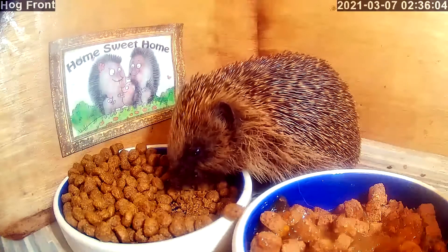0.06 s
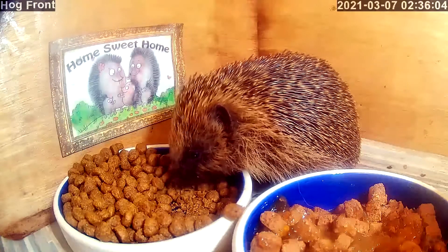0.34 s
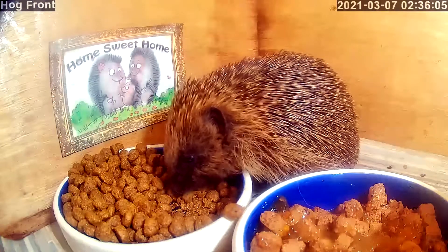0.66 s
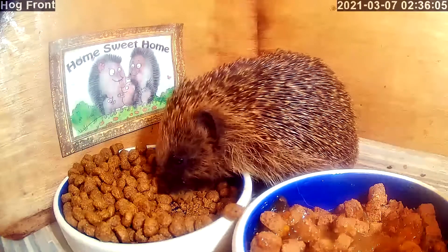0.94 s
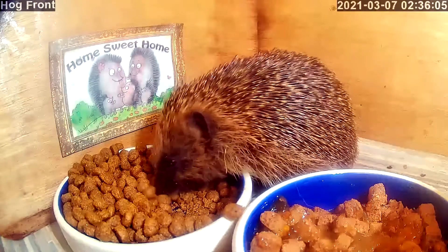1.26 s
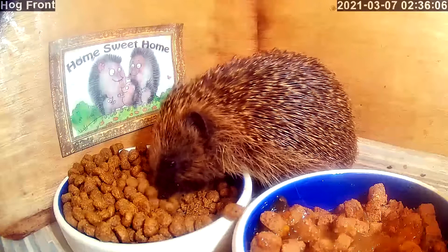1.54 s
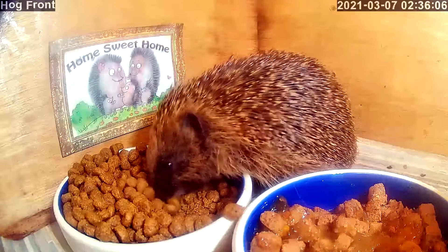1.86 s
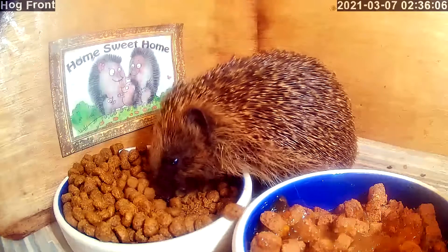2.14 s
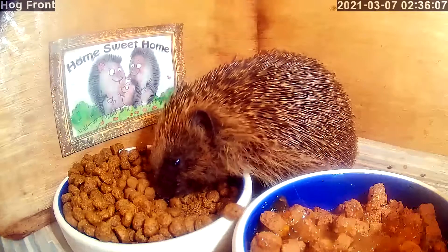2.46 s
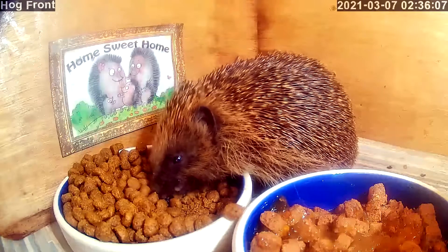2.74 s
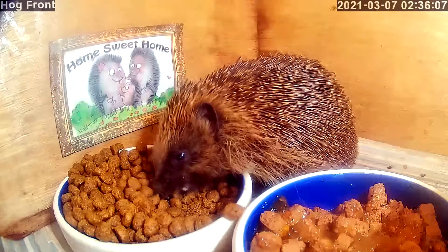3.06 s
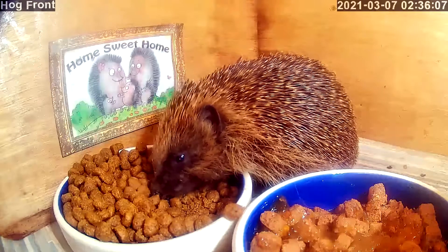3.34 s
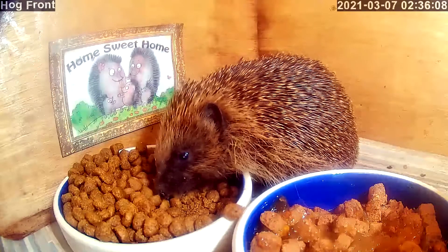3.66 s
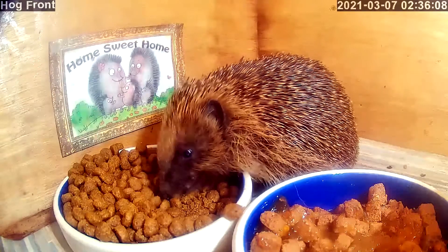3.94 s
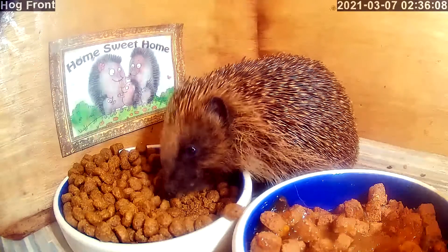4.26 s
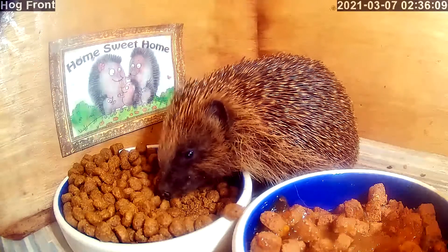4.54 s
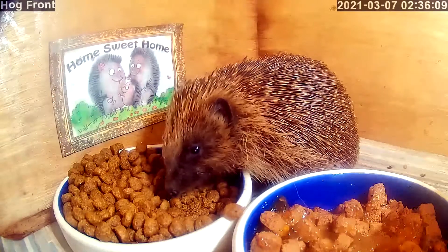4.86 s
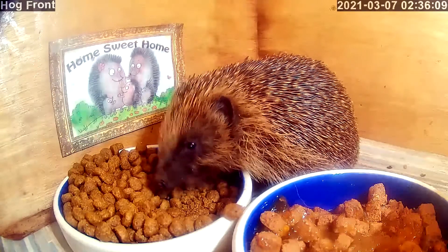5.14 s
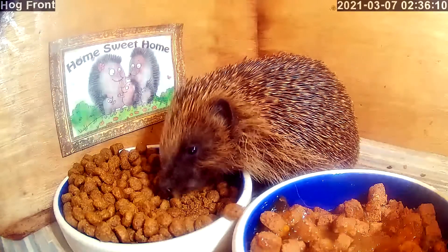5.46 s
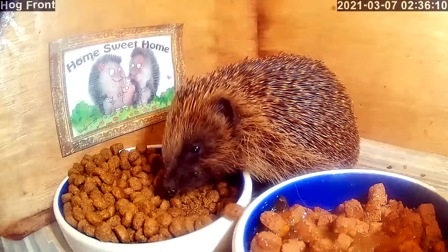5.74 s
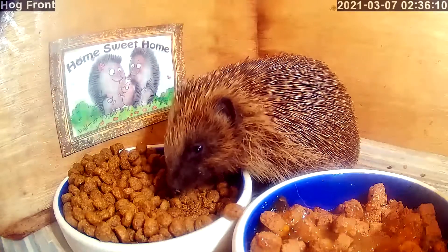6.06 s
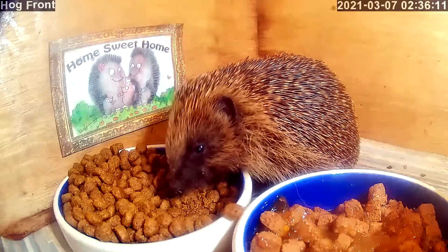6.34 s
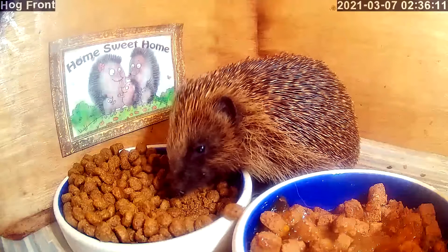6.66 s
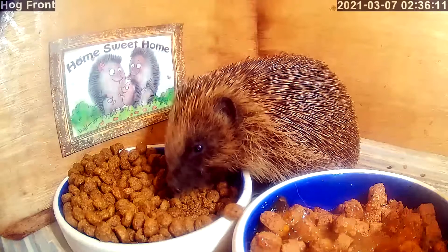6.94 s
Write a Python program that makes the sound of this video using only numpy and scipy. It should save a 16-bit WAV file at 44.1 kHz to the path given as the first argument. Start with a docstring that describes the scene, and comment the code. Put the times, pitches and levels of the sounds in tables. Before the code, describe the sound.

A hedgehog thumps softly on a wooden floor, sniffs, then crunches dry kibble in a small box over a faint hum.

```python
"""A hedgehog eats dry kibble in a small wooden feeding box, close to a night camera.
Over the camera's faint hum and hiss, paws thud on the floor board. The snout bumps the bowl, the
feet shuffle, and it puffs through its nose into the food. Then the kibble cracks, every break
ringing the box; a paw skids on the wood, and the chewing grows finer and finer."""
import sys
import numpy as np
from scipy import signal
from scipy.fft import rfft, irfft
from scipy.io import wavfile
from scipy.ndimage import uniform_filter1d

SR = 44100
rng = np.random.default_rng(int(sys.argv[2]) if len(sys.argv) > 2 else 0)


def materialize(psi):
    """Save the field psi as 16-bit PCM at rate SR to the path in sys.argv[1].

    A 1-D psi becomes a single channel; in a 2-D psi each row is a channel.
    """
    bounded = np.clip(np.atleast_2d(psi).T, -1, 1)
    quanta = np.round(bounded * 32767).astype(np.int16)
    wavfile.write(sys.argv[1], SR, quanta)


N = 317520
RING_TIME_S = np.arange(SR // 6) / SR  # time after a hit
HIT_SAMPLES = SR // 20  # a hit's level is its energy spread over 50 ms
STRAIN_SAMPLES = SR // 40  # a piece strains this long before it breaks


def undb(db):
    """Decibels to gain."""
    return 10 ** (np.asarray(db) / 20)


def at_rms(x, db):
    """A steady sound set to an rms level."""
    return x * undb(db) / np.sqrt(np.mean(x ** 2))


def hit_at(x, db):
    """A short sound set to a level by its energy."""
    return x * undb(db) / np.sqrt(np.sum(x ** 2) / HIT_SAMPLES)


def add(out, start_s, x):
    """Mix x into out from start_s on."""
    i = max(int(start_s * SR), 0)
    out[i:i + len(x)] += x[:len(out) - i]


def butter(x, hz, kind, order=4):
    """Butterworth filter."""
    return signal.sosfilt(signal.butter(order, hz, kind, fs=SR, output="sos"), x)


def excite(force, response):
    """Play a force through an impulse response, for the length of the longer one."""
    return signal.fftconvolve(force, response)[:max(len(force), len(response))]


def equalise(x, curve, size=2048):
    """Minimum-phase EQ through (freq_hz, gain_db) points."""
    hz, db = np.transpose(curve)
    bins_hz = np.arange(size + 1) * SR / (2 * size)
    log_gain = np.log(undb(np.interp(np.log(bins_hz + 1), np.log(hz), db)))
    cepstrum = irfft(log_gain)[:size] * np.r_[1, np.full(size - 1, 2)]
    return excite(x, irfft(np.exp(rfft(cepstrum, 2 * size)))[:size])


def ring(modes):
    """One damped sine a row; neighbours swing opposite ways, so their sum takes a moment to build."""
    t = RING_TIME_S
    return np.array([(-1) ** k * undb(db) / t60_s * np.sin(2 * np.pi * hz * t) * undb(-60 * t / t60_s)
                     for k, (hz, db, t60_s) in enumerate(modes)])


def drift(rate_hz):
    """Smooth random movement with a spread of 1."""
    hold = int(SR / rate_hz)
    stairs = np.repeat(rng.standard_normal(N // hold + 1), hold)[:N]
    smooth = uniform_filter1d(uniform_filter1d(stairs, hold), hold)
    return smooth / smooth.std()


def fader(curve):
    """Gain that rides through (time_s, gain_db) points and is silent outside them."""
    times_s, db = np.transpose(curve)
    ride_db = np.interp(np.arange(N) / SR, times_s, db, left=-np.inf, right=-np.inf)
    return uniform_filter1d(undb(ride_db), SR // 200)


def grains(samples, rate_hz, spread_db):
    """Tiny random clicks of uneven size."""
    fires = rng.random(samples) < rate_hz / SR
    sizes = undb(spread_db * rng.standard_normal(samples))
    return fires * sizes * rng.choice([-1, 1], samples)


# EQ of the noise bed: freq_hz, gain_db
HISS_EQ = [(25, -12.5), (50, -20.5), (66, 2.5), (100, 3.5), (200, -8), (400, -13), (1000, -17.5),
           (2200, -22), (3200, -25.5), (4000, -32.5), (5000, -44), (7000, -58)]
# the hum and its two thin whines: pitch_hz, level_db
HUM_TONES = [(101, -71.5), (1647, -108.5), (2105, -88.5)]


def camera_noise(hiss_db=-67.5, waver_hz=5, flutter_db=2):
    """The camera's bed of low rumble and hiss, with a wavering hum and whine."""
    hiss = at_rms(equalise(rng.standard_normal(N), HISS_EQ), hiss_db)
    bed = hiss * undb(1.2 * drift(rate_hz=0.67))
    for hz, db in HUM_TONES:
        phase = 2 * np.pi * np.cumsum(hz + waver_hz * drift(rate_hz=39)) / SR
        bed += at_rms(np.sin(phase) * undb(flutter_db * drift(rate_hz=4.1)), db)
    return bed


# low modes of the floor board: pitch_hz, weight_db, t60_s
BOARD_MODES = [(86.7, 3.5, 0.15), (110.5, -0.5, 0.069), (135, -5.5, .06), (225, -8, 0.075),
               (308.2, -13, 0.066)]
# footfalls: start_s, thud_db, knock_re_thud_db
FOOTFALLS = [(0.063, -43.5, -1.5), (0.212, -45.5, -2), (0.321, -47.5, -30), (0.464, -46, -46),
             (0.561, -59.5, -8.5), (0.787, -58.5, -0.5), (0.818, -52, -8), (0.94, -53, -24),
             (1.068, -50, -5), (1.214, -72, 11), (1.374, -34.5, -9), (1.426, -42, -10.5), (1.554, -45, -18),
             (1.601, -37.5, -11.5), (1.638, -43, -32), (2.426, -46, -16), (2.964, -42, -3),
             (3.024, -54, -3), (3.058, -39.5, -23), (3.1, -52, -4), (3.43, -50.5, -7), (6.799, -56, -2.5)]


def paws(push_s=0.0048, detune=0.05, crossover_hz=165):
    """Soft pushes on the floor board, which rings a little differently at each spot."""
    out = np.zeros(N)
    push = np.sin(np.pi * np.minimum(RING_TIME_S[:SR // 50] / push_s, 1)) ** 2
    for start_s, thud_db, knock_re_thud_db in FOOTFALLS:
        modes = [(hz * (1 + detune * rng.standard_normal()), db, t60_s) for hz, db, t60_s in BOARD_MODES]
        board = signal.fftconvolve(push, ring(modes).sum(axis=0))
        thud = hit_at(butter(board, crossover_hz, "low", order=2), thud_db)
        knock = hit_at(butter(board, crossover_hz, "high"), thud_db + knock_re_thud_db)
        add(out, start_s - push_s, thud + knock)  # the paw lands just before the board swings
    return out


# EQ of the dense reflections between the walls: freq_hz, gain_db
WALL_EQ = [(200, -14), (780, -17.5), (1300, 13), (1650, 4.5), (1900, -4.5), (2500, 6), (3100, -3),
           (3650, -3.5), (4400, -12.5), (5100, -19.5), (5650, -29), (6050, -37), (6350, -33.5),
           (6800, -34.5), (7300, -53.5)]


def wall_echoes(t60_s=0.057, build_s=0.00077):
    """A click bouncing between the close walls."""
    envelope = (1 - np.exp(-RING_TIME_S / build_s)) * undb(-60 * RING_TIME_S / t60_s)
    return hit_at(equalise(rng.standard_normal(len(envelope)) * envelope, WALL_EQ), 0)


# modes of the box and the air in it: pitch_hz, weight_db, t60_s
BOX_MODES = [(274, -17.5, 0.06), (317, -20, 0.047), (443.1, 1.5, 0.13), (621, -8, 0.085),
             (723, -11.5, 0.023), (867, -2, 0.062), (950.7, 2, 0.081), (1049, -4, 0.091),
             (1205.5, 3.5, 0.047), (1290, 2, 0.022), (1408, -6, 0.022), (1622, -4.5, 0.047),
             (1716, -5.5, 0.065), (1840, -26, 0.15), (2030, -25, 0.13), (2204, -19.5, 0.087),
             (2364, -9.5, 0.058), (2487, -13, 0.039), (2350, -15.5, 0.15), (2680, -19, 0.17)]


def box_response(walls, spread_db=2, walls_db=-11, spot_echoes_db=-10):
    """The box's answer to a click; each spot favours other modes and adds its own reflections."""
    weights = undb(spread_db * rng.standard_normal(len(BOX_MODES)))
    ringing = hit_at(weights @ ring(BOX_MODES), 0)
    return ringing + undb(walls_db) * walls + undb(spot_echoes_db) * wall_echoes()


def fracture(crumble_s, debris_db, snap_s=0.0012, strain_s=0.011, debris_s=0.028):
    """Force on kibble: a brittle piece goes in one snap, a crushed one in a run of small breaks."""
    t = RING_TIME_S[:SR // 8] - STRAIN_SAMPLES / SR
    breaks = grains(len(t), rate_hz=2200, spread_db=7) * (t >= 0) * np.exp(-np.abs(t) / crumble_s)
    force = hit_at(breaks + 1e-18, db=-6.5)
    force[STRAIN_SAMPLES] += np.sqrt(HIT_SAMPLES) * snap_s / crumble_s  # the main snap
    force = hit_at(force, 0)
    # the halves break again a moment later
    delay_s = 0.009 * (1 + 0.15 * rng.standard_normal())
    add(force, STRAIN_SAMPLES / SR + delay_s, hit_at(np.ones(1), db=-9))
    # a creak before it gives and grinding crumbs after, too small to push much air
    envelope = np.exp(np.minimum(t / strain_s, -t / debris_s))
    debris = grains(len(t), rate_hz=2200, spread_db=7) * envelope
    return force + hit_at(butter(debris, hz=1300, kind="high", order=1), debris_db)


# dull bumps of the snout in the bowl: start_s, boom_db
SNOUT_BUMPS = [(0.563, -59.5), (1.432, -47), (4.917, -47.5), (6.389, -59.5), (6.42, -61.5), (6.481, -51),
               (6.806, -48.5)]


def snout_bumps(walls, boom_hz=(210, 540), rattle_re_boom_db=-14):
    """The snout nudges the bowl: the air in the box booms and the kibble barely rattles."""
    out = np.zeros(N)
    for start_s, boom_db in SNOUT_BUMPS:
        nudge = excite(fracture(crumble_s=0.0019, debris_db=-3), box_response(walls))
        boom = hit_at(butter(nudge, boom_hz, "band"), boom_db)
        rattle = hit_at(nudge, boom_db + rattle_re_boom_db)
        add(out, start_s - STRAIN_SAMPLES / SR, boom + rattle)
    return out


def shuffle(box, start_s=0.71, end_s=2, feet_db=-63, rustle_db=-72):
    """Shifting feet stir the floor board while loose kibble rustles under the snout."""
    board = excite(grains(N, rate_hz=70, spread_db=4), ring(BOARD_MODES).sum(axis=0))
    kibble = excite(grains(N, rate_hz=60, spread_db=5), box)
    feet = at_rms(butter(board, hz=330, kind="low"), feet_db)
    rustle = at_rms(butter(kibble, hz=800, kind="low", order=1), rustle_db)
    return (feet + rustle) * fader([(start_s, 0), (end_s, 0)])


# the jaw closes and grinds, mostly just ahead of a snap: start_s, level_db, crumble_s
GRINDS = [(0.819, -75.5, 0.0029), (0.966, -62.5, 0.03), (2.295, -47.5, 0.024), (2.485, -45, .002),
          (3.205, -54, 0.0042), (3.314, -45, .002), (3.39, -44.5, 0.0033), (3.662, -57, 0.03),
          (3.76, -57, .003), (3.864, -69.5, .002), (3.948, -71, 0.0078), (4.007, -62.5, 0.0042),
          (4.104, -48, 0.0012), (4.217, -65, 0.016), (4.559, -52, 0.026), (4.93, -49.5, 0.014),
          (5.298, -57, 0.026), (5.74, -57, 0.035), (6.072, -66, 0.041), (6.389, -79, 0.016),
          (6.612, -78, 0.006), (6.967, -64.5, 0.06), (7.024, -64, 0.0018)]
# a piece of kibble snaps; the rows at 1.036 and 1.388 s are sharp ticks within sniffs: start_s, level_db,
# brightness_db
SNAPS = [(1.036, -67, 18.5), (1.371, -45.5, 2), (1.388, -49, -5), (1.626, -50.5, 10), (1.812, -45, 7.5),
         (1.875, -40.5, -10), (1.923, -25, -1.5), (2.022, -28, 2), (2.06, -24, 1.5), (2.111, -34, 0),
         (2.343, -38.5, -2), (2.358, -36.5, 5), (2.392, -26.5, -4.5), (2.45, -36, 0), (2.506, -29, -1),
         (2.559, -31.5, 1.5), (2.751, -42.5, 8), (2.808, -24, -0.5), (2.855, -30, -0.5), (2.907, -39, -24),
         (2.937, -22.5, -4.5), (2.98, -34.5, 2.5), (2.993, -40.5, -0.5), (3.219, -38.5, 5.5),
         (3.281, -47.5, -11.5), (3.32, -29, 0.5), (3.33, -36.5, 1), (3.406, -26, -2.5), (3.443, -39, -2.5),
         (3.46, -53.5, 2), (3.717, -33, 6.5), (3.779, -38, 2.5), (4.018, -30, -2), (4.056, -46.5, 2.5),
         (4.118, -28.5, -1.5), (4.608, -44.5, 4), (4.636, -51.5, -1.5), (4.961, -40, -5),
         (5.069, -46.5, -4.5), (5.355, -47, 2), (5.77, -49, 2.5), (6.117, -56, 4), (6.706, -55, 6),
         (6.806, -57, 15)]
# a bite's boom, body, snap and crispness bands: low_hz, high_hz
BITE_BANDS = [(210, 530), (550, 1950), (2050, 3200), (3250, 8000)]


def chewing(walls, hardest_db=-21, grind_bright_db=2.5, snap_crumble_s=0.0014,
            crumb_count=8, crumb_span_s=(0.25, 7), crumb_db=-73, crumb_s=0.0026):
    """Grinding chews, brittle snaps and stray shifting crumbs each ring the box."""
    out = np.zeros(N)
    snaps = [(start_s, db, bright_db, snap_crumble_s) for start_s, db, bright_db in SNAPS]
    grinds = [(start_s, db, grind_bright_db, crumble_s) for start_s, db, crumble_s in GRINDS]
    crumbs = [(rng.uniform(*crumb_span_s), crumb_db + 3 * rng.standard_normal(), 0, crumb_s)
              for _ in range(crumb_count)]
    hard_tone_db = np.array([-12.5, 0.5, -14, -18])  # band balance of the hardest bite
    gentle_tilt = np.array([0.22, 0.0062, 0.041, 0.02])  # gentler bites keep more of their boom
    bright_tilt = np.array([0.51, 0, 1, 1])  # bright breaks lift the treble and, less, the boom
    for start_s, db, bright_db, crumble_s in snaps + grinds + crumbs:
        gentle_db = hardest_db - db
        force = fracture(crumble_s, debris_db=-20 + 0.17 * gentle_db)  # gentler bites grind more
        crack = excite(force, box_response(walls))
        levels_db = db + hard_tone_db + gentle_db * gentle_tilt + bright_db * bright_tilt
        bite = sum(hit_at(butter(crack, band_hz, "band"), band_db)
                   for band_hz, band_db in zip(BITE_BANDS, levels_db))
        add(out, start_s - STRAIN_SAMPLES / SR, bite)
    return out


def nose_resonance(breath, hz, width_hz=480):
    """One resonance of the nose: a narrow band of the breath."""
    return butter(breath, [hz - width_hz / 2, hz + width_hz / 2], "band", order=2)


# sniffs in the food: start_s, length_s, level_db
NOSE_PUFFS = [(0.925, 0.036, -68.5), (0.946, 0.08, -73), (1.028, 0.02, -63), (1.178, 0.031, -72),
              (1.208, 0.015, -67), (1.359, 0.056, -44), (1.419, 0.093, -68.5), (1.579, 0.084, -53),
              (1.732, .035, -64.5), (2.224, 0.036, -56.5)]


def snuffling(nostril_hz=2990, nostril_spread=0.014, upper_hz=(4750, 5300), shove_hz=(600, 1050)):
    """Puffs through the nose, each tuned anew as the nostrils narrow; the snout shoves the kibble."""
    out = np.zeros(N)
    box = ring(BOX_MODES).sum(axis=0)
    for start_s, length_s, db in NOSE_PUFFS:
        pitch_hz = nostril_hz * (1 + nostril_spread * rng.standard_normal())
        stroke = np.sin(np.pi * np.minimum(RING_TIME_S / length_s, 1))
        breath = rng.standard_normal(len(stroke)) * stroke ** 2
        puff = excite(breath, wall_echoes(t60_s=0.063))  # the walls soften its tail
        nostril = hit_at(nose_resonance(puff, pitch_hz), db)
        upper = sum(hit_at(nose_resonance(puff, hz), db - 14) for hz in upper_hz)
        air = hit_at(puff, db - 19)
        add(out, start_s, butter(nostril + upper + air, hz=5450, kind="low", order=10))
        kibble = excite(grains(len(stroke), rate_hz=370, spread_db=3.5) * stroke, box)
        add(out, start_s, hit_at(butter(kibble, shove_hz, "band", order=3), db - 1))
    return out


# judder of the board under the skidding paw's weight: time_s, level_db
JUDDER_FADER = [(2.04, -48.5), (2.08, -36.5), (2.21, -35.5), (2.27, -62)]
# swell of the skid's rub and scratch: time_s, gain_db
SKID_FADER = [(2.11, -32), (2.13, -23.5), (2.238, -34.5), (2.29, -69)]


def paw_skid(box, judder_hz=(58, 190)):
    """A paw sticks and slips: the board judders, dull tugs ring the box, the claws scratch faintly."""
    slips = grains(N, rate_hz=450, spread_db=1)
    judder = at_rms(butter(slips, judder_hz, "band", order=2), 0) * fader(JUDDER_FADER)
    tugs = excite(slips, box)
    rub = at_rms(butter(tugs, hz=820, kind="low", order=6), -2)
    scratch = at_rms(butter(tugs, hz=1390, kind="high"), -26)
    return judder + (rub + scratch) * fader(SKID_FADER)


def scene():
    """Everything inside the box, heard by one microphone."""
    walls = wall_echoes()
    eating = chewing(walls) + snout_bumps(walls) + snuffling()
    feet = paws() + shuffle(box_response(walls)) + paw_skid(box_response(walls))
    return (eating + feet + camera_noise())[None]


def record(dry, low_cut_hz=55.3, high_cut_hz=7050):
    """The small camera loses the deep bass and cuts the top steeply."""
    thin = butter(dry, low_cut_hz, "high")
    return signal.sosfilt(signal.ellip(8, 0.2, 70, high_cut_hz, fs=SR, output="sos"), thin)


dry = scene()
out = record(dry)
materialize(out)
```